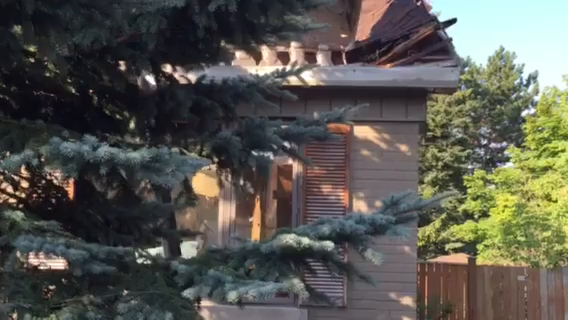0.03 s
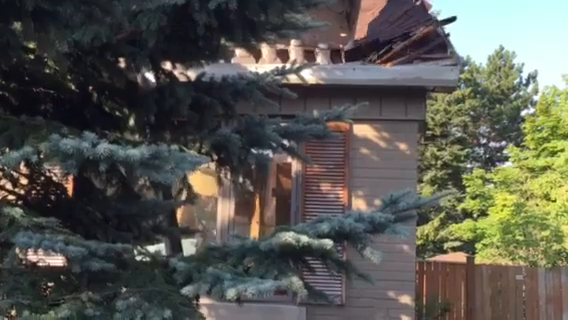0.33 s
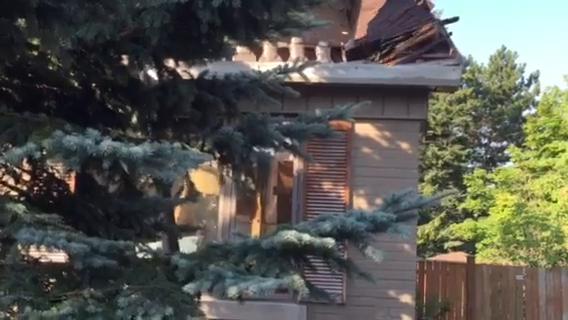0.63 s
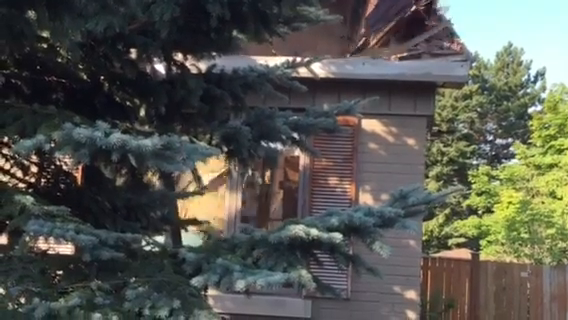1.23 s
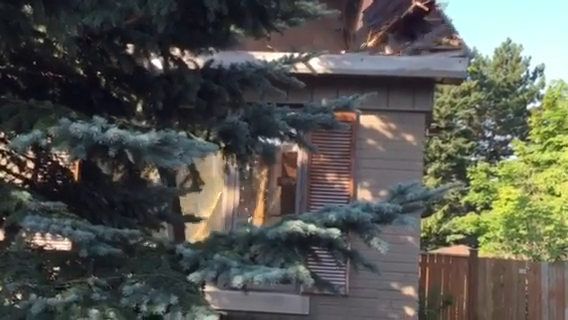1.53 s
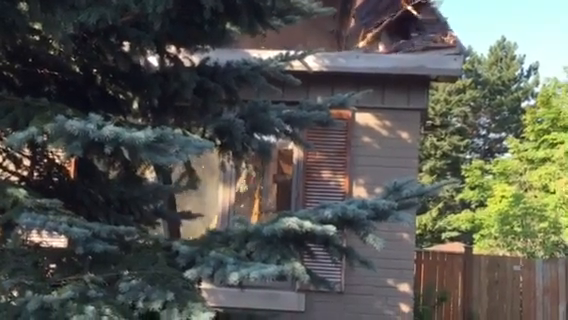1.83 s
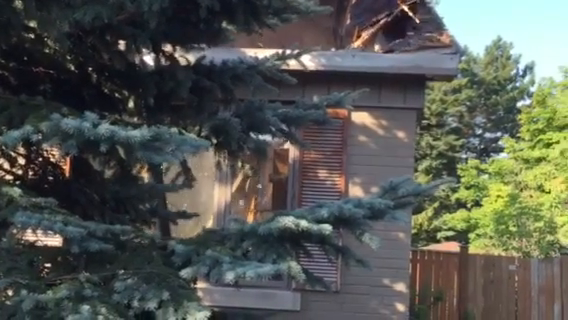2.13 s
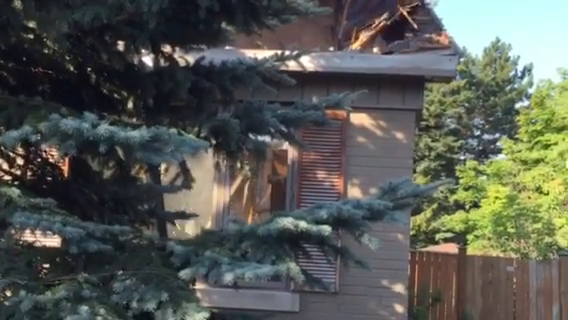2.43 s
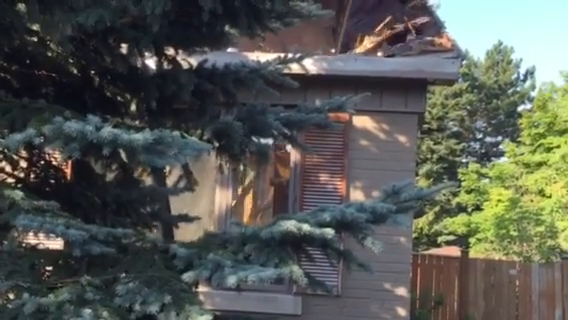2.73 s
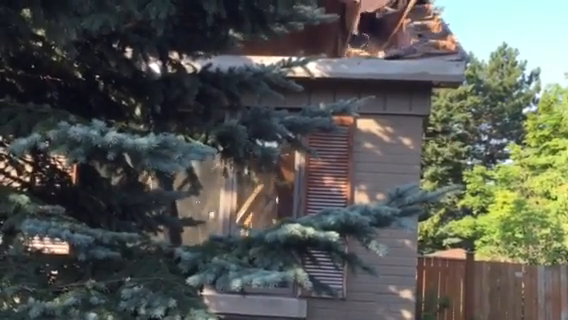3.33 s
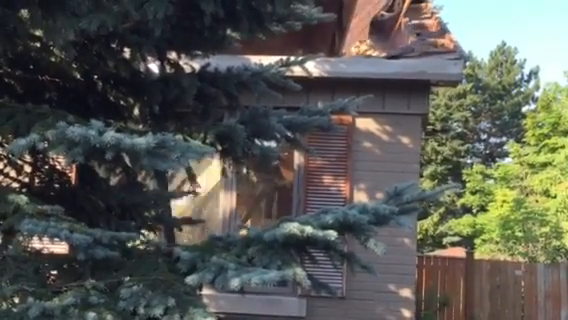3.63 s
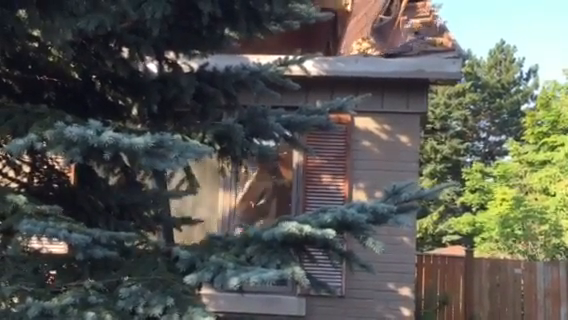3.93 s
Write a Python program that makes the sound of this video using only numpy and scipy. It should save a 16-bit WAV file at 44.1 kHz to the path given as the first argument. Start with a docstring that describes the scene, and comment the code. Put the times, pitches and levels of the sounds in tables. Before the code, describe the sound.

Timber snaps in sharp bursts as a house is torn down outdoors. A roof piece gives way with a crash, followed by clattering planks, sliding debris and scattered cracks, while an excavator's diesel engine drones throughout.

```python
"""In a garden, a diesel excavator pulls a wooden house apart.
Boards fracture in bursts of clicks coloured by the wood's resonances, and a piece of roof gives way
with a crash and two thuds. A loose plank and a nailed joint ring at their modes, a slat clatters and
debris slides down. Nearby walls reflect these sounds, over the periodic drone of the engine's firing."""
import sys
import numpy as np
from scipy import signal
from scipy.fft import rfft, irfft
from scipy.io import wavfile
from scipy.ndimage import uniform_filter1d, minimum_filter1d

SR = 44100
rng = np.random.default_rng(int(sys.argv[2]) if len(sys.argv) > 2 else 0)


def file_out(sig):
    """Save sig as 16-bit WAV at sys.argv[1]."""
    # one column per channel
    cols = np.atleast_2d(sig).T
    # limit, then scale
    lim = np.clip(cols, -1, 1)
    pcm = np.round(lim * 32767).astype(np.int16)
    wavfile.write(sys.argv[1], SR, pcm)


N = 176400
TIME = np.arange(N) / SR

# flow of sliding debris: time_s, level_db, tilt_db_per_octave
DEBRIS_FLOW = [(0, -30.5, 0.5), (.2, -40, 1.5), (.48, -42.5, 0), (.7, -40.5, -0.5), (.85, -41.5, 0),
               (.98, -36, 0), (1.2, -28, -1), (1.48, -39.5, -2.5), (1.78, -33, -.5), (2.15, -43.5, 0.5),
               (2.39, -46, -0.5), (2.56, -41.5, -0.5), (2.79, -42.5, -2.5), (2.93, -37.5, 1),
               (3.1, -32, -1.5), (3.42, -35.5, 1), (3.58, -39.5, -1), (4, -36, -.5)]


def cracks():
    """Brittle fracture: a snap and a dying shower of splinters excite each board's resonances."""
    # start_s, level_db, ring_hz, tilt_db_per_octave, decay_s
    fractures = [(.010, -21.5, 1320, 8.5, 0.01), (.018, -22.5, 750, -0.5, 0.013),
                 (0.0725, -23, 1110, 3.5, 0.0044), (.083, -24, 1160, -1.5, 0.0071),
                 (.153, -29.5, 900, -0.5, 0.017), (0.2456, -18.5, 1270, 0.5, 0.017),
                 (.320, -26, 1800, -0.5, .006), (.331, -25, 790, -1.5, .013), (0.3956, -31, 2530, -5, .007),
                 (.539, -26.5, 1480, -4, 0.013), (0.584, -24.5, 2830, 6, 0.014),
                 (.594, -24.5, 910, -3, 0.015), (.631, -24.5, 760, -0.5, 0.021),
                 (.774, -30, 2840, 1, 0.0084), (1.025, -21, 1150, -2.5, 0.0098),
                 (1.036, -15, 1700, -.5, 0.04), (1.135, -21, 2500, -3, 0.033), (1.186, -27, 8900, 0, 0.017),
                 (1.335, -20, 3700, 0, 0.009), (1.611, -16.5, 935, -0.1, .016),
                 (1.726, -32, 3040, 4, 0.006), (1.752, -26, 3880, 0, .0051), (1.804, -30, 3830, -1, 0.012),
                 (1.874, -20.5, 420, -3.5, 0.022), (1.8852, -14.5, 1450, 0.5, 0.0043),
                 (1.907, -22, 1480, -1, 0.008), (1.974, -23.5, 627, -11, 0.004),
                 (2.178, -25, 800, -5, 0.015), (2.433, -31.5, 2030, -6, 0.038),
                 (2.679, -32.5, 890, 3, 0.01), (3.042, -27.5, 980, 2, 0.063), (3.130, -25, 1210, 0.5, 0.05),
                 (3.215, -27, 1010, -1.5, 0.028), (3.306, -30, 705, -5, .012),
                 (3.356, -29.5, 1390, -3, 0.035), (3.486, -23, 7300, -2, 0.021),
                 (3.633, -27, 940, -3.5, 0.027), (3.674, -27, 950, -4, 0.012),
                 (3.9673, -18, 3600, -0.5, 0.0046)]
    snap_s, clean_break_s = 0.00074, 0.009
    ring_db, ring_octaves = 7.5, 0.32
    out, t = np.zeros(N), np.arange(SR // 4) / SR
    for start_s, level_db, ring_hz, tilt, decay_s in fractures:
        envelope = np.exp(-t / decay_s) * (1 - np.exp(-t / (0.15 * decay_s)))
        shower = clicks(len(t), per_s=7000, spread_db=2) * envelope
        snap = np.sign(rng.standard_normal(len(t))) * t / snap_s * np.exp(1 - t / snap_s)
        drive = shower + amp(5.5) * min(clean_break_s / decay_s, 1) * snap  # slow breaks start softer
        board = board_resonances()
        low_hz = min(0.62 * ring_hz, 1800)  # the board radiates little below this
        ring = lambda f: ring_db / (1 + (np.log2((f + 1) / ring_hz) / ring_octaves) ** 2)
        bass_loss = lambda f: 10 * np.log10(1 + (low_hz / (f + 20)) ** 3)
        crack = colour(drive, lambda f: timber(f, tilt) + board(f) + ring(f) - bass_loss(f))
        add(out, start_s, amp(level_db) * crack)
    return out


def roof_crash():
    """Fibres tear in quick swells; a board radiates above its lowest mode, so long ones sound deeper."""
    # peak_s, level_db, rise_s, fall_s, tilt_db_per_octave, lowest_mode_hz
    swells = [(1.062, -15.5, 0.023, .026, -1, 610), (1.148, -28, 0.029, 0.042, 0, 300),
              (1.2, -22, 0.019, 0.012, 5.5, 300), (1.27, -26.5, 0.021, 0.015, 1.5, 394),
              (1.317, -17.5, 0.027, 0.034, -2.1, 198), (1.385, -26.5, 0.022, 0.038, -6, 205)]
    out = np.zeros(N)
    for peak_s, level_db, rise_s, fall_s, tilt, low_hz in swells:
        width_s = np.where(TIME < peak_s, rise_s, fall_s)
        swell = np.exp(-0.5 * ((TIME - peak_s) / width_s) ** 2)
        board = board_resonances()
        tearing = swell * clicks(N, per_s=6500, spread_db=1)
        bass_loss = lambda f: 10 * np.log10(1 + (low_hz / np.maximum(f, 100)) ** 8)
        out += amp(level_db) * colour(tearing, lambda f: timber(f, tilt) + board(f) - bass_loss(f))
    return out


def thuds():
    """Damped impact: heavy timber lands with a short burst of low-frequency noise."""
    # start_s, level_db
    landings = [(1.287, -17.5), (1.314, -19.5)]
    centre_hz, rise_s, decay_s = 204, 0.011, 0.048
    band_db = lambda f: -20 * np.log10(1 + 0.3 * np.log2((f + 20) / centre_hz) ** 4)
    out, t = np.zeros(N), np.arange(SR // 2) / SR
    for start_s, level_db in landings:
        blow = rng.standard_normal(len(t)) * np.minimum(t / rise_s, 1) * np.exp(-t / decay_s)
        add(out, start_s, amp(level_db) * colour(blow, band_db))
    return out


def loose_plank():
    """Free vibration: a knocked plank rings at three closely spaced modes."""
    modes = [(1460, -3.5, 0.1), (1518, -7.5, 0.11), (1640, -7, 0.084)]  # pitch_hz, level_db, t60_s
    knocks = [(1.248, -22), (1.262, -16.5), (1.354, -18), (1.393, -20), (1.888, -19), (1.908, -26)]  # start_s, level_db
    return ringing(modes, knocks)


def nailed_joint():
    """Free vibration: a struck joint pings at high, quickly damped modes."""
    modes = [(3410, -1.5, 0.033), (3720, -7, .05), (6400, -23, 0.028), (6680, -5, 0.028)]  # pitch_hz, level_db, t60_s
    pings = [(1.297, -14), (1.334, -11.5), (1.347, -12), (1.610, -13.5)]  # start_s, level_db
    return ringing(modes, pings)


def slat():
    """Source and filter: three dry taps excite the resonances of a thin falling slat."""
    spectrum = [(1300, -21), (1950, 0), (2450, -12), (3200, -6), (4000, 1.5), (4450, -17), (12000, -25)]  # frequency_hz, gain_db
    taps = [(2.324, -33.5), (2.485, -29), (2.771, -38.5)]  # start_s, level_db
    decay_s = 0.016
    drive, t = np.zeros(N), np.arange(SR // 4) / SR
    for start_s, level_db in taps:
        tap = clicks(len(t), per_s=6400, spread_db=1) * np.exp(-t / decay_s)
        add(drive, start_s, amp(level_db) * tap)
    return colour(drive, lambda f: read(spectrum, f))


def debris():
    """Granular flow: tiny impacts of chips and grit merge into noise that comes in clumps."""
    time_s, level_db, tilts = np.transpose(DEBRIS_FLOW)
    grains = clicks(N, per_s=3000, spread_db=0.5)
    grains *= amp(np.interp(TIME, time_s, level_db) + 2 * drift(hz=18))
    tilt = np.interp(TIME, time_s, tilts)
    out = np.zeros(N)
    for step in range(-6, 7, 2):  # crossfade between duller and brighter spectra
        weight = np.maximum(1 - abs(tilt - step) / 2, 0)
        out += weight * colour(grains, lambda f: timber(f, step))
    return out


def offcuts():
    """Offcuts of random size collide in the debris; each rings with a short bar's inharmonic modes."""
    knocks_per_s, middle_hz, decay_cycles = 65, 951.4, 11
    out, t = np.zeros(N), np.arange(SR // 8) / SR
    time_s, level_db, _ = np.transpose(DEBRIS_FLOW)
    for when, smallness, softness in rng.random((round(knocks_per_s * N / SR), 3)):
        start_s = when * N / SR
        hz = middle_hz * 2.4 ** (2 * smallness - 1)
        knock = sum(np.sin(2 * np.pi * hz * ratio * t) * np.exp(-t * hz * ratio / decay_cycles) / ratio
                    for ratio in (1, 1.45, 2.76))
        knock_db = np.interp(start_s, time_s, level_db) + 5 - 12 * softness
        add(out, start_s, amp(knock_db) * knock)
    return out


def engine():
    """Periodic firing gives exhaust harmonics and pulsing noise; unequal cylinders add weak lines."""
    speed = [(0, 94.4), (1.3, 93.33), (1.7, 93.93), (2.8, 93.85), (3.2, 91.13), (3.7, 93.3), (4, 92.4)]  # time_s, firing_hz
    exhaust_db = [-18, -22.5, -37.5, -48.5]  # level_db of firing harmonics 1 to 4
    weak_lines = [(40, -57), (110, -39), (145, -37.5), (200, -47.5), (300, -54.5), (480, -73.5),
                  (900, -60.5), (1600, -65.5)]  # frequency_hz, level_db
    noise_spectrum = [(24, -33), (55, 1.5), (110, 10), (220, 8), (330, 1.5), (480, -24), (900, -9.5),
                      (1400, -14), (2500, -14), (5000, -34), (9500, -42), (10600, -41), (15500, -40)]  # frequency_hz, gain_db
    cylinders, fan_hz, pulse_depth = 6, 117.9, 0.11
    firing_phase = 2 * np.pi * np.cumsum(np.interp(TIME, *np.transpose(speed))) / SR
    tones = -sum(amp(db + 0.41 * k * drift(hz=5.4)) * np.sin(k * firing_phase)
                 for k, db in enumerate(exhaust_db, 1))
    wander = [drift(hz=2.8) for _ in range(7)]
    for k in range(2, 100):  # harmonics of the full engine cycle, skipping the exhaust's own
        if k % cylinders or k > cylinders * len(exhaust_db):
            order = k / cylinders
            scatter_db = min(order, 5) * rng.uniform(-1, 1)
            phase = order * firing_phase + 0.68 * wander[k % len(wander)] + 2 * np.pi * rng.random()
            tones += amp(read(weak_lines, speed[0][1] * order) + scatter_db) * np.cos(phase)
    tones += amp(-36) * np.cos(2 * np.pi * fan_hz * TIME + 0.5 * drift(hz=8.7))  # fan hum
    pulsing = rng.standard_normal(N) * (1 + pulse_depth * np.cos(firing_phase))
    clatter = unit(colour(pulsing, lambda f: read(noise_spectrum, f)))
    return np.sqrt(2) * tones + amp(-35.5 + 0.95 * drift(hz=2.4)) * clatter


def garden_echo(x):
    """Reverberation: walls, fence and trees scatter the sound, and the bass lingers longest."""
    decay_times = [(200, 0.84), (1500, 0.15), (5000, 0.19), (14000, 0.27)]  # frequency_hz, t60_s
    count, echoes_per_s, first_echo_s = SR // 2, 2000, 0.004
    echoes = rng.standard_normal(count) * (rng.random(count) < echoes_per_s / SR)
    echoes *= np.arange(count) > first_echo_s * SR
    hz, t, bands = signal.stft(echoes, SR, nperseg=256)
    decay = amp(-60 * t / read(decay_times, hz)[:, None])
    tail = signal.istft(bands * decay, SR, nperseg=256)[1]
    return signal.fftconvolve(x, tail / np.linalg.norm(tail))[:N]


def ringing(modes, blows):
    """Modal response: an impulse and brief contact chatter drive a sum of damped sinusoids."""
    chatter_s, detune = 0.008, 0.0038
    out, t = np.zeros(N), np.arange(SR // 3) / SR
    for start_s, level_db in blows:
        chatter = clicks(len(t), per_s=3000, spread_db=4.5) * np.exp(-t / chatter_s)
        drive = 0.5 * chatter / np.linalg.norm(chatter)
        drive[0] += 1
        ring = np.zeros(len(t))
        for hz, mode_db, t60_s in modes:
            hz *= 1 + detune * rng.standard_normal()
            ring += amp(mode_db - 60 * t / t60_s) * np.sin(2 * np.pi * hz * t)
        add(out, start_s, amp(level_db) * signal.fftconvolve(drive, ring))
    return out


def timber(hz, tilt):
    """Spectral envelope of breaking wood in dB, tilted about 2 kHz in dB per octave."""
    spectrum = [(100, -9.5), (300, -1), (1300, -0.5), (2300, -4), (3800, -5), (5200, -8.5), (9000, -11),
                (10700, -16.5), (15500, -21.5)]  # frequency_hz, gain_db
    return read(spectrum, hz) + tilt * np.log2(np.maximum(hz, 300) / 2000)


def board_resonances():
    """Each board has its own irregular modes: returns a random response, dB against frequency."""
    points = np.c_[np.geomspace(250, 14000, 90), 2.3 * rng.standard_normal(90)]
    return lambda hz: read(points, hz)


def clicks(count, per_s, spread_db):
    """Shot noise of unit rms: random impulses, many small and a few large."""
    size = amp(spread_db * np.minimum(rng.exponential(1, count), 4))
    return unit(size * rng.choice([-1, 1], count) * (rng.random(count) < per_s / SR))


def colour(x, db_at):
    """Minimum-phase filter of unit energy with the given spectral shape."""
    size = 4096
    log_gain = np.log(amp(db_at(abs(np.fft.fftfreq(size, 1 / SR)))))
    response = np.exp(np.conj(signal.hilbert(log_gain)))
    taps = np.fft.ifft(response).real[:size // 2]
    return signal.fftconvolve(x, taps / np.linalg.norm(taps))[:len(x)]


def drift(hz):
    """Low-pass noise of unit rms: slow random motion up to about the given rate."""
    f = np.fft.rfftfreq(N, 1 / SR)
    low_pass = np.exp(-np.minimum(f / hz, 20) ** 2)
    return unit(irfft(rfft(rng.standard_normal(N)) * low_pass, N))


def read(points, hz):
    """Interpolates a curve on a log-frequency axis."""
    f, value = np.transpose(points)
    return np.interp(np.log(hz + 1), np.log(f), value)


def add(mix, start_s, sound):
    """Superposes a sound on the mix at a given time."""
    part = mix[max(round(start_s * SR), 0):][:len(sound)]
    part += sound[:len(part)]


def amp(db):
    """Decibels to amplitude ratio."""
    return 10 ** (np.asarray(db) / 20)


def unit(x):
    """Scales to an rms of one."""
    return x / np.sqrt(np.mean(x ** 2) + 1e-20)


def scene():
    """Superposition of the breaking house, its echo and the engine, in mono."""
    house = cracks() + roof_crash() + thuds() + debris() + offcuts()
    house += loose_plank() + nailed_joint() + slat()
    return (house + amp(-10.5) * garden_echo(house) + engine())[None]


def record(dry):
    """Peak limiting holds the loudest cracks down; a low-pass filter then limits the band."""
    ceiling, cutoff_hz = 0.7, 15600
    gain = np.minimum(ceiling / (abs(dry) + 1e-9), 1)
    limited = dry * uniform_filter1d(minimum_filter1d(gain, size=180), size=180)
    low_pass = signal.firwin(511, cutoff_hz, window=("kaiser", 9), fs=SR)
    return signal.oaconvolve(limited, low_pass[None], "same")


dry = scene()
out = record(dry)
file_out(out)
```